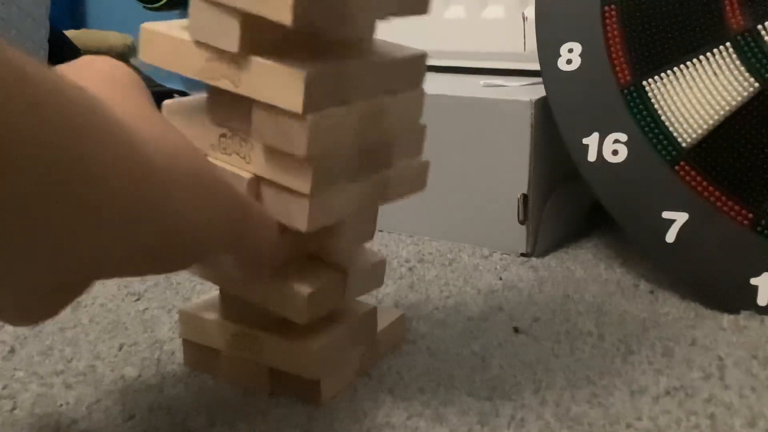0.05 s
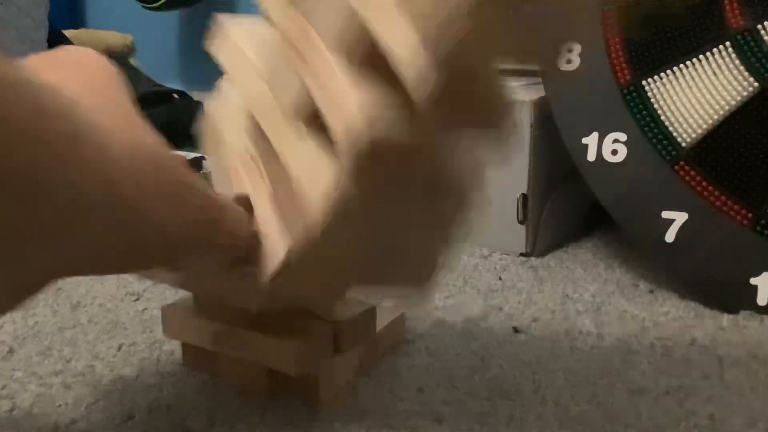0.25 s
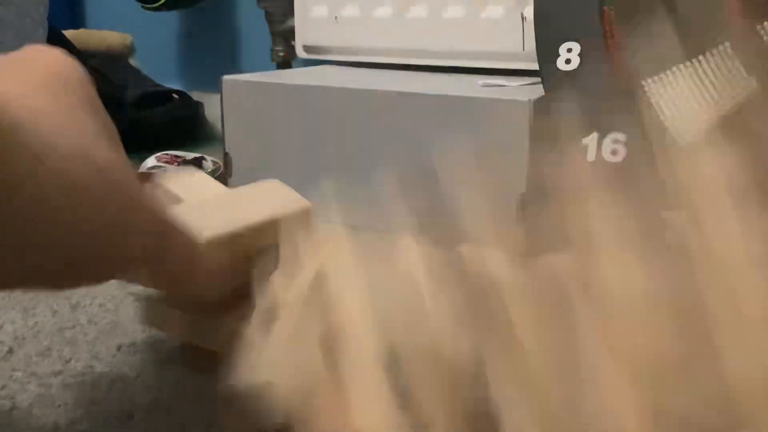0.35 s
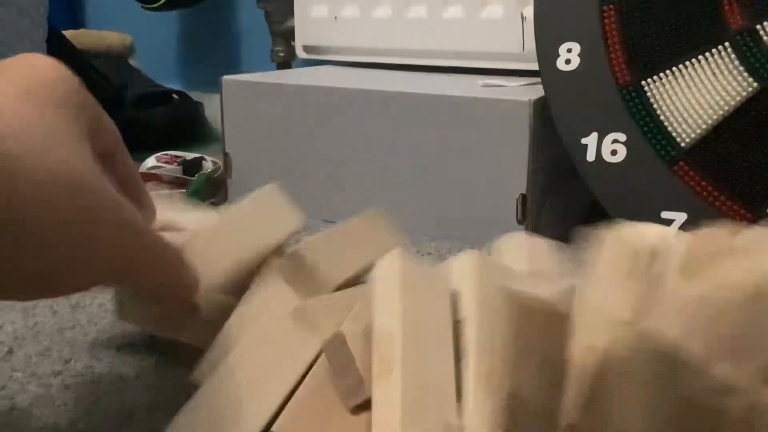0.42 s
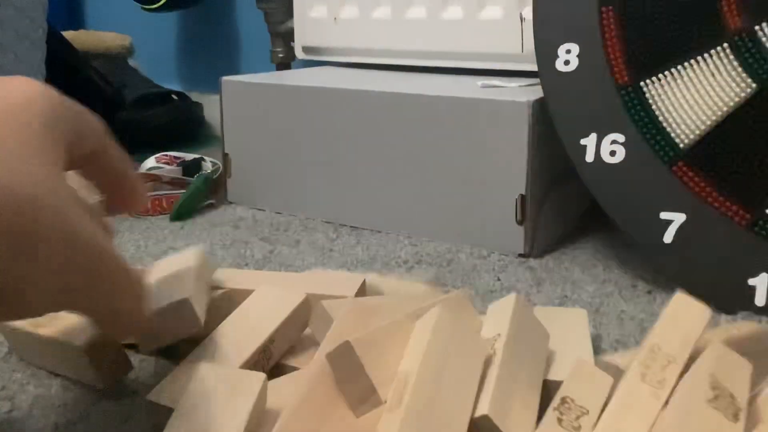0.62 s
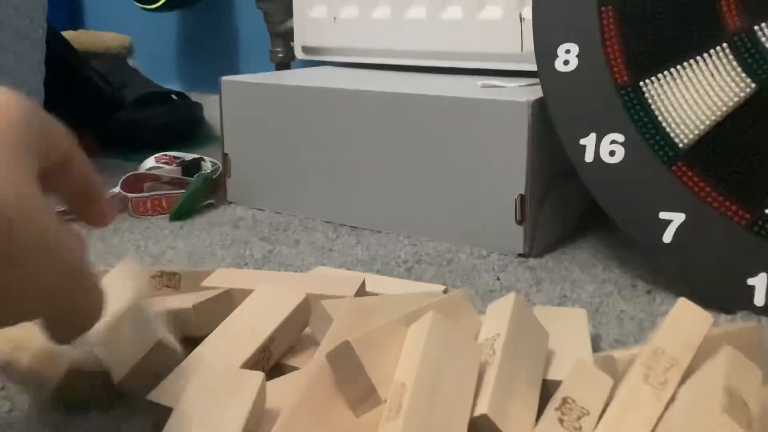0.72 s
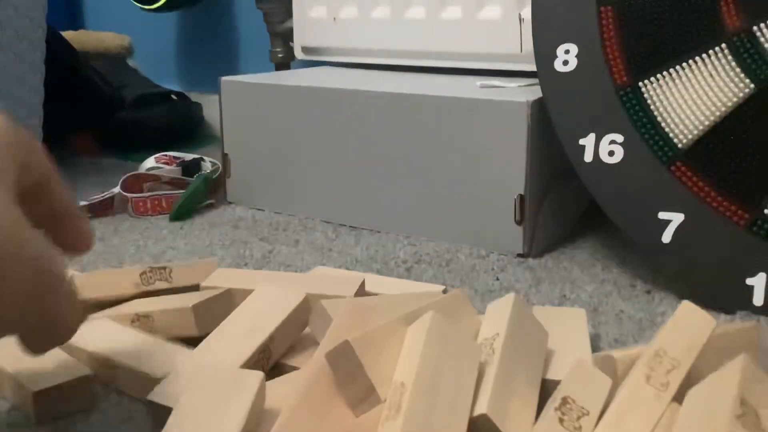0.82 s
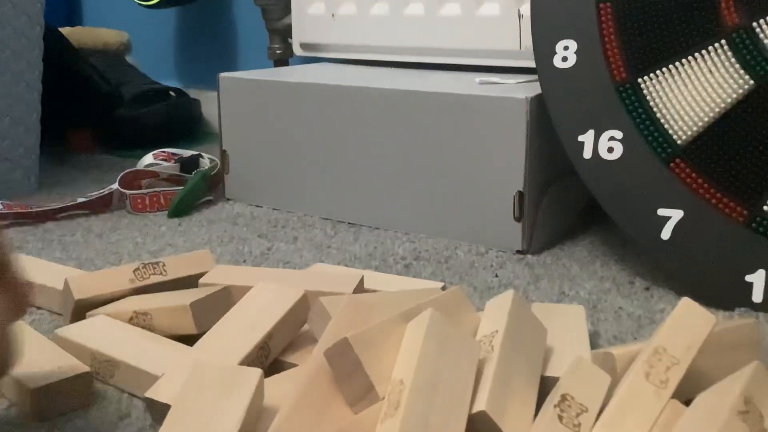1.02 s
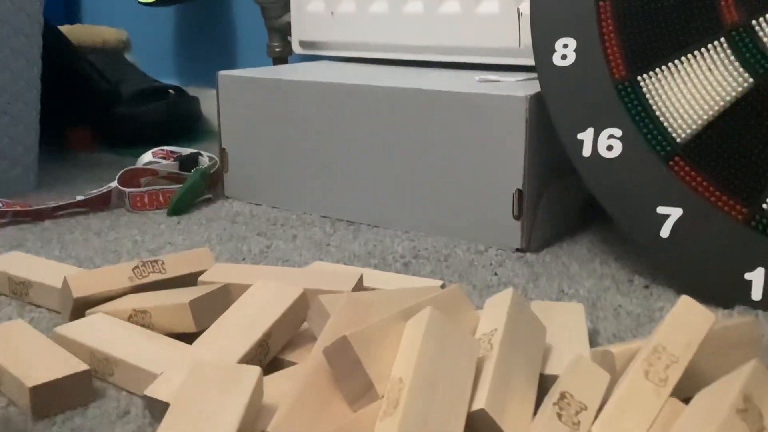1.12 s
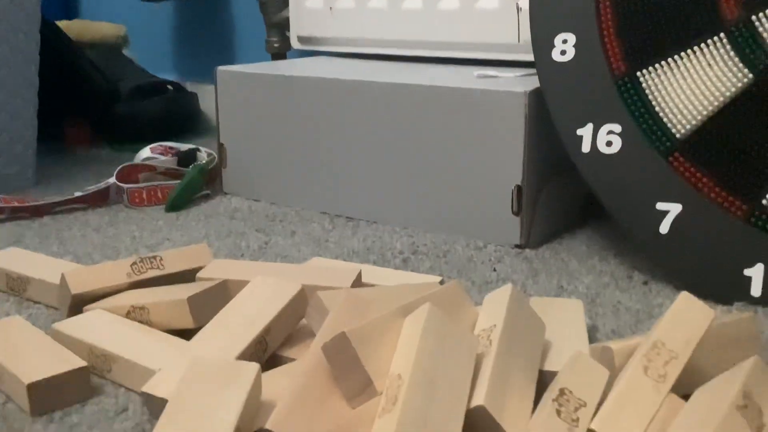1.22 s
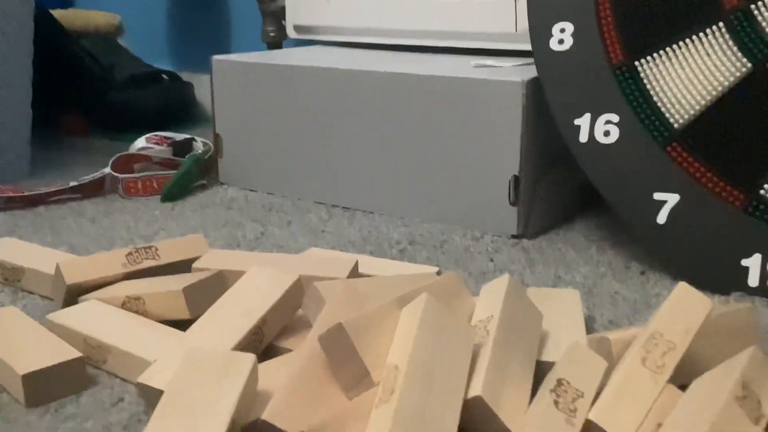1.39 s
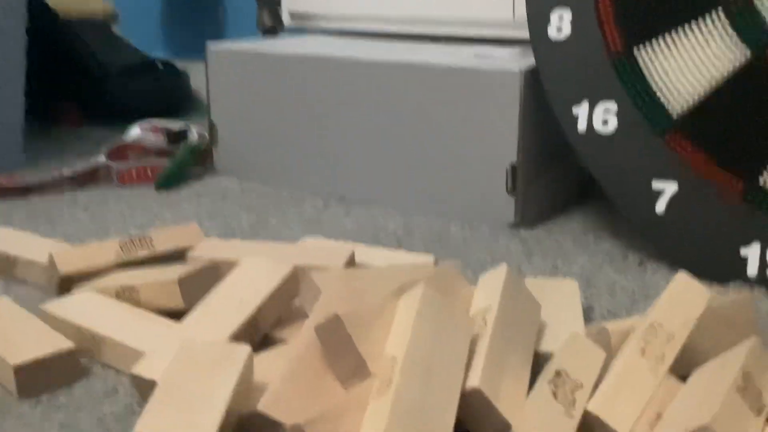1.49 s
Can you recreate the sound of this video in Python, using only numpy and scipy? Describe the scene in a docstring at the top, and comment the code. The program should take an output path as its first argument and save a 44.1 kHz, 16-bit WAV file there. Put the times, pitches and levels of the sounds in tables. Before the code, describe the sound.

A tower of wooden blocks topples and clatters onto a carpeted floor.

```python
"""A tower of small hardwood blocks topples onto a carpeted floor in a small room, close to the microphone.
Each collision excites a block's high, quickly damped modes: one sharp clack, then a cascade of clicks.
Landings on the carpet give dull thuds; a last block drops and rings the floor, and two faint ticks follow.
A low hum runs underneath, and a soft hiss swells in once the pile lies still."""
import sys
import numpy as np
from scipy import signal
from scipy.fft import rfft, irfft, next_fast_len
from scipy.io import wavfile

SR = 44100
rng = np.random.default_rng(int(sys.argv[2]) if len(sys.argv) > 2 else 0)


def put_to_file(sound):
    """Save the sound as 16-bit audio at rate SR, in the file named by the first command-line argument."""
    columns = np.atleast_2d(sound).T  # one column per channel
    safe = np.clip(columns, -1, 1)
    whole_steps = np.round(safe * 32767)
    wavfile.write(sys.argv[1], SR, whole_steps.astype(np.int16))


N = 68355
FREQS, AGE = np.fft.rfftfreq(8192, 1 / SR), np.arange(8192) / SR  # axes of one blow: Hz, s
MAIN_T60_S, MAIN_WIDTH_HZ = 0.016, 340  # a block's main mode
MODE_SCATTER = .016  # relative spread of mode frequencies from blow to blow
THUD_RISE_S = 0.00059


def amp(db):
    """Amplitude ratio of a level in decibels."""
    return 10 ** (np.asarray(db) / 20)


def unit(x):
    """Normalisation to rms 1."""
    return x / np.sqrt(np.mean(x ** 2) + 1e-20)


def along(points, hz):
    """Interpolation of (frequency_hz, value) points on a logarithmic frequency axis."""
    frequencies, values = np.transpose(points)
    return np.interp(np.log(hz + 1), np.log(frequencies + 1), values)


def level(points):
    """Amplitude envelope through (time_s, level_db) points."""
    return amp(np.interp(np.arange(N) / SR, *np.transpose(points)))


def fade(t, t60):
    """Exponential decay: 60 dB in t60 seconds."""
    return np.exp(-np.log(1000) * t / t60)


def add(track, start_s, sound):
    """Superposition of a sound onto the track."""
    i = int(start_s * SR)
    track[i:i + len(sound)] += sound[:N - i]


def filtered(x, colour):
    """Minimum-phase filtering by (frequency_hz, gain_db) points, through the folded cepstrum."""
    gain = amp(along(colour, FREQS))
    cepstrum = irfft(np.log(np.maximum(gain, 1e-5)))
    half = len(cepstrum) // 2
    cepstrum[1:half] *= 2
    cepstrum[half + 1:] = 0
    response = irfft(np.exp(rfft(cepstrum)))
    return signal.fftconvolve(x, response)[:N]


def noise(colour):
    """Spectrally shaped Gaussian noise at rms 1."""
    return unit(filtered(rng.standard_normal(N), colour))


def hump(hz, octaves):
    """A Gaussian band on a logarithmic frequency axis."""
    return np.exp(-(np.log2((FREQS + 1) / hz) / octaves) ** 2 / 2)


def burst(band, t60, rise_s=0.00025, span_s=0.0032):
    """Free decay of dense modes filling a band, with the energy of rms 1 held for span_s."""
    x = irfft(band * np.exp(2j * np.pi * rng.random(len(band))))
    attack = 1 - np.exp(-AGE / rise_s)
    envelope = fade(AGE, t60) * attack
    for _ in range(2):  # impose envelope and spectrum in turn
        x = np.cos(np.angle(signal.hilbert(x))) * envelope
        x = irfft(band * np.exp(1j * np.angle(rfft(x))))
    release = np.cos(np.pi * np.minimum(AGE / AGE[-1], .5)) ** 2
    x = x * attack * release
    return x * np.sqrt(span_s * SR / np.sum(x ** 2))


def mode(hz, t60, width_hz):
    """Damped resonance of a block: a slightly rough ring with a Lorentzian spectrum."""
    return burst(1 / (1 + ((FREQS - hz) / width_hz) ** 2), t60)


def background():
    """Slow amplitude modulation makes a low hum waver over dull room noise and a soft hiss."""
    # time_s, level_db
    hum_levels = [(0, -50.5), (.3, -48), (.6, -62), (1, -62), (1.55, -60.5)]
    hiss_levels = [(0, -84), (.2, -82), (1, -86), (1.195, -97.5), (1.24, -57.5), (1.42, -55.5),
                   (1.53, -52.5)]
    # frequency_hz, gain_db
    dull_colour = [(30, -11.5), (110, 6), (230, -13), (420, -4.5), (700, -19), (2000, -32.5)]
    hiss_colour = [(100, -13), (550, -3), (1000, -1), (3300, 2), (5200, 0.5), (7500, -8), (12000, -8),
                   (15500, -16)]
    hum_hz, waver_db, dull_db = 109.4, -0.2, -74
    waver = unit(signal.resample(rng.standard_normal(20), N))
    hum = amp(waver_db * waver) * unit(np.sin(2 * np.pi * hum_hz * np.arange(N) / SR))
    dull = amp(dull_db) * noise(dull_colour)
    hiss = level(hiss_levels) * noise(hiss_colour)
    return level(hum_levels) * hum + dull + hiss


def contacts(colour, per_s=1700, spread_db=8):
    """Shot noise: a dense, filtered train of tiny blows of random size, at rms 1."""
    struck = rng.random(N) < per_s / SR
    sizes = amp(spread_db * np.clip(rng.standard_normal(N), -2, 2))
    signs = rng.choice([-1, 1], N)
    return unit(filtered(struck * sizes * signs, colour))


def jostle():
    """Contact noise of sliding blocks: a bright snap grows as a power of the force."""
    # time_s, level_db
    force_levels = [(.14, -77), (.17, -56), (.3, -49.5), (.325, -30.5), (.35, -28.5), (.41, -27),
                    (.45, -32), (.505, -30.5), (.525, -27.5), (.55, -29), (.6, -31.5), (.68, -43.5),
                    (.82, -45.5), (.855, -57.5), (.91, -39), (.95, -70), (1.02, -84)]
    # frequency_hz, gain_db
    jostle_colour = [(100, -17), (330, 4.5), (600, 6.5), (1500, 2), (3000, -5.5), (6000, -22), (7300, -1.5),
                     (8600, -14), (10200, 8.5), (11500, -4.5), (15000, -24.5)]
    snap_colour = [(700, -20.5), (1900, 1.5), (2650, -0.5), (3900, 0), (4700, -1), (6000, -1.5),
                   (7500, -0.5), (9000, -4.5), (12000, -26.5)]
    reference_db, snap_db, exponent = -27.5, -2, 2.7
    force = level(force_levels)
    snap = amp(reference_db + snap_db) * (force / amp(reference_db)) ** exponent
    return force * contacts(jostle_colour) + snap * contacts(snap_colour)


def taps(main_hz=9990):
    """Light impact: a brief contact gives a broadband tick and excites the block's main mode."""
    # start_s, tick_db, tick_hz, main_db
    touches = [(.1625, -53.5, 2730, -72), (0.199, -43.5, 2640, -49.5), (0.4569, -33.5, 1978, -29.5),
               (.47, -45, 2630, -21.5), (0.6041, -32, 998, -35), (.647, -31.5, 1976, -31.5),
               (0.6515, -33, 1700, -44), (0.6625, -37.5, 1700, -46), (0.7095, -35, 1500, -65),
               (0.7229, -36.5, 2114, -36.5), (0.727, -35, 1500, -29.5), (0.7338, -35, 2300, -58),
               (.7554, -43, 1788, -33), (.778, -36, 1600, -48), (.7925, -47, 2400, -53),
               (0.8075, -40, 1380, -61), (0.815, -42.5, 1900, -45), (0.8319, -40, 1000, -36.5),
               (0.8424, -35.5, 1050, -45), (0.872, -50, 1476, -46), (0.8843, -35, 1800, -38),
               (1.0715, -60, 1750, -100), (1.1267, -70.5, 1107, -96)]
    out = np.zeros(N)
    for start_s, tick_db, tick_hz, main_db in touches:
        tick = burst(hump(tick_hz, octaves=0.65), t60=.006)
        detune = 1 + MODE_SCATTER * rng.standard_normal()
        main = mode(detune * main_hz, MAIN_T60_S, MAIN_WIDTH_HZ)
        add(out, start_s, amp(tick_db) * tick + amp(main_db) * main)
    return out


def clacks():
    """Hard impact of block on block: a low knock, a short crack and the free ringing of high modes."""
    # start_s, knock_db, knock_hz, crack_db, crack_hz, bend_db, sides_db, main_db, main_hz
    collisions = [ (.2492, -20, 926, -18, 4100, -23, -18.5, -14, 9290),
                  (.2500, -26, 731, -26.5, 3000, -24.5, -24, -14, 9840),
                  (.316, -24, 850, -21.5, 2700, -23, -25, -16.5, 10350),
                  (.332, -19, 1150, -18.5, 3400, -19, -14.5, -26.5, 9900),
                  (0.3429, -19, 520, -20.5, 2500, -28.5, -19.5, -16, 10600),
                  (0.345, -17.5, 540, -24, 2900, -26.5, -18.5, -22, 9800),
                  (0.3529, -26.5, 512, -13.5, 2760, -17, -28.5, -32, 9950),
                  (0.358, -35.5, 350, -24, 3100, -26, -14.5, -22.5, 9740),
                  (0.3668, -36.5, 500, -35.5, 3500, -31, -23, -25.5, 9200),
                  (0.3727, -37, 700, -23, 3663, -31, -22.5, -29, 10500),
                  (0.3773, -32.5, 900, -26.5, 3770, -27, -24.5, -30.5, 11100),
                  (.38, -27.5, 1200, -33.5, 3400, -24.5, -23.5, -14.5, 11600),
                  (0.3891, -40, 700, -32.5, 3900, -24.5, -26.5, -32.5, 9600),
                  (.3934, -36, 700, -26.5, 3700, -28.5, -27, -20, 9100),
                  (0.3996, -25, 479, -22.5, 3600, -20.5, -18, -16.5, 10300),
                  (0.4137, -24.5, 750, -30, 2900, -24, -23, -25, 10300),
                  (.476, -57, 900, -40, 2800, -30, -38, -12, 9930),
                  (.519, -40, 700, -35, 2900, -30, -28, -16.5, 9830),
                  (0.5255, -29.5, 700, -30, 2900, -28, -29, -21, 10480),
                  (0.5307, -27.5, 700, -31.5, 2600, -36.5, -29, -20, 9850),
                  (0.536, -28.5, 700, -24, 2900, -29, -26.5, -16.5, 10620),
                  (0.549, -37, 700, -27.5, 3202, -28, -31, -22.5, 10500),
                  (0.5586, -41, 1300, -25.5, 3100, -24, -27.5, -14.5, 10620),
                  (.5739, -24.5, 1400, -29.5, 2900, -22.5, -30, -32, 10300),
                  (0.5822, -41, 1500, -33.5, 2900, -26, -19, -23.5, 9870),
                  (0.6269, -28, 1300, -32.5, 2703, -49, -26.5, -22.5, 10260),
                  (0.8912, -25, 600, -34, 3164, -37, -36.5, -20.5, 9820)]
    out = np.zeros(N)
    for start_s, knock_db, knock_hz, crack_db, crack_hz, bend_db, sides_db, main_db, main_hz in collisions:
        knock = amp(knock_db) * burst(hump(knock_hz, octaves=.7), t60=.014)
        crack = amp(crack_db) * burst(hump(crack_hz, octaves=.3), t60=.0095)
        detune = 1 + MODE_SCATTER * rng.standard_normal()
        bend = amp(bend_db) * mode(hz=detune * 5010, t60=.0095, width_hz=800)
        lower = mode(hz=detune * 7444, t60=0.015, width_hz=630)
        upper = mode(hz=detune * 12370, t60=0.015, width_hz=630)
        sides = amp(sides_db) * (lower + amp(-8.5) * upper)  # modes on either side of the main one
        main = amp(main_db) * mode(main_hz, MAIN_T60_S, MAIN_WIDTH_HZ)
        add(out, start_s, knock + crack + bend + sides + main)
    return out


def rumble():
    """Forced vibration: the floor shakes under the tumbling pile."""
    # time_s, level_db
    shake_levels = [(.24, -84), (.28, -60.5), (.36, -46), (.43, -28.5), (.49, -40.5), (.6, -39.5),
                    (.7, -46), (.865, -55), (.89, -34.5), (1.08, -77)]
    # frequency_hz, gain_db
    floor_colour = [(25, -23.5), (60, -4.5), (110, 1.5), (180, 2), (350, -9), (700, -13.5), (1500, -61)]
    return level(shake_levels) * noise(floor_colour)


def thuds():
    """Cushioned impact: blocks landing on the carpet excite only low frequencies."""
    # start_s, level_db, pitch_hz
    landings = [(0.252, -48, 215), (.343, -25.5, 556), (.362, -30, 184), (0.406, -27, 171.3),
                (.412, -24.5, 571.4), (.423, -22, 495), (.431, -29, 719), (.442, -30.5, 284),
                (.495, -24.5, 636), (0.531, -29.5, 438), (0.564, -32, 340.7), (0.589, -32.5, 170),
                (.607, -33, 198.3), (.72, -34.5, 658), (0.799, -42.5, 396), (.88, -27, 513),
                (.888, -25.5, 285.3), (1.073, -61, 734), (1.128, -62, 584), (1.336, -59.5, 573),
                (1.502, -61, 598)]
    out = np.zeros(N)
    for start_s, level_db, pitch_hz in landings:
        thud = burst(hump(pitch_hz, octaves=.28), t60=0.053, rise_s=THUD_RISE_S, span_s=0.0084)
        add(out, start_s, amp(level_db) * thud)
    return out


def last_drop():
    """Modal ringing: the last block and its bounce strike a hollow note from the floor."""
    # start_s, level_db
    blows = [(0.893, -21.5), (.914, -35)]
    # pitch_hz, gain_db, t60_s
    floor_modes = [(208.3, -13, 0.094), (385.4, -15, 0.12), (472, 6, 0.064), (579, -1.5, 0.089),
                   (922, -7.5, 0.057)]
    ring = sum(amp(db) * fade(AGE, t60) * np.sin(2 * np.pi * hz * AGE) for hz, db, t60 in floor_modes)
    attack = 1 - np.exp(-AGE / THUD_RISE_S)
    out = np.zeros(N)
    for start_s, level_db in blows:
        add(out, start_s, amp(level_db) * ring * attack)
    return out


def room(x, delay_s=.007):
    """Diffuse reverberation: each stretch of the fall has its own tail of decaying noise."""
    # frequency_hz, t60_s
    decay_times = [(150, 0.48), (700, 0.11), (4000, 0.17), (10000, 0.3), (15000, 0.18)]
    # frequency_hz, gain_db
    room_colour = [(150, -4.5), (600, -2), (4500, -2), (9000, -8)]
    out = np.zeros(N)
    for part in np.array_split(np.arange(N), 20):
        hz, t, spectra = signal.stft(rng.standard_normal(SR // 2), SR, nperseg=256)
        decay = fade(t, along(decay_times, hz)[:, None])
        _, tail = signal.istft(spectra * decay, SR, nperseg=256)
        add(out, part[0] / SR + delay_s, signal.fftconvolve(x[part], tail / np.linalg.norm(tail)))
    return filtered(out, room_colour)


def scene():
    """Superposition of the blocks' direct sound, its reverberation and the background, in mono."""
    blocks = clacks() + taps() + jostle() + rumble() + thuds() + last_drop()
    return (blocks + amp(-13) * room(blocks) + background())[None]


def record(dry, top_hz=16000):
    """Transduction: the microphone thins bass and top treble; soft saturation and a low-pass follow."""
    # frequency_hz, gain_db
    microphone = [(25, -12.5), (45, -2.5), (65, -2), (10800, -0.5), (12000, -6.5), (13200, 0.5),
                  (15000, -6.5)]
    x = filtered(dry[0], microphone)
    x = x / (1 + np.abs(x) ** 10) ** (1 / 10)  # rounds off the highest peaks
    size = next_fast_len(N + SR // 2)
    passband = np.fft.rfftfreq(size, 1 / SR) < top_hz
    return irfft(rfft(x, size) * passband, size)[None, :N]


dry = scene()
out = record(dry)
put_to_file(out)
```